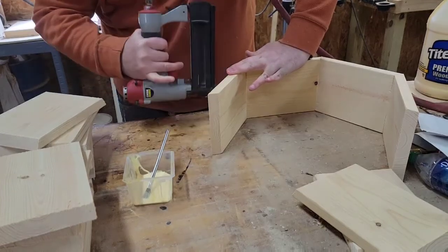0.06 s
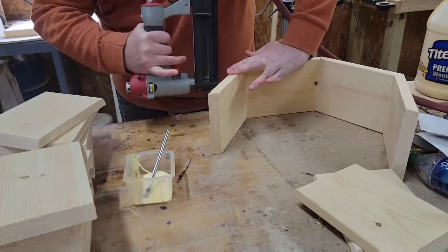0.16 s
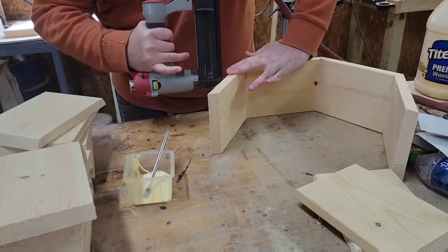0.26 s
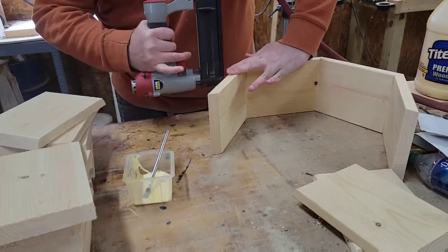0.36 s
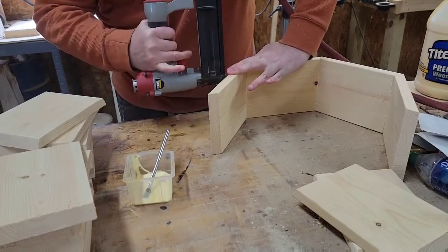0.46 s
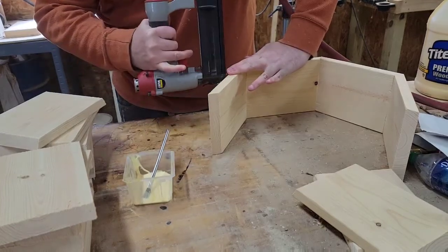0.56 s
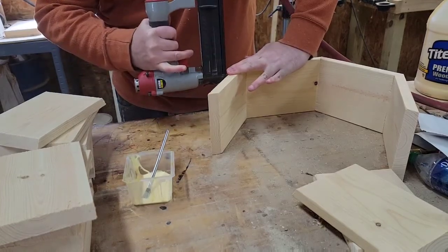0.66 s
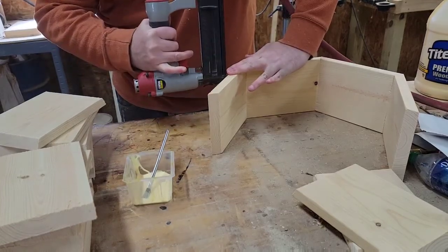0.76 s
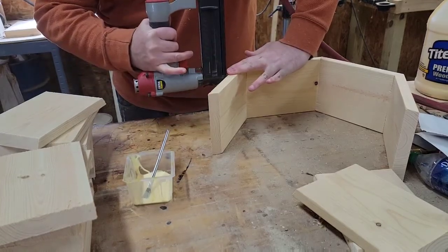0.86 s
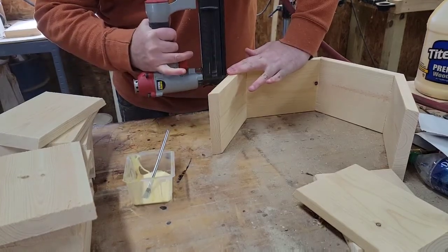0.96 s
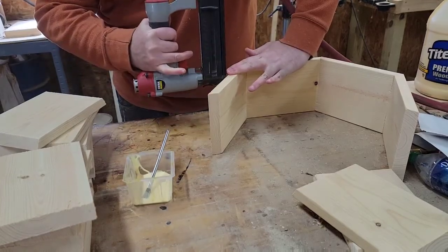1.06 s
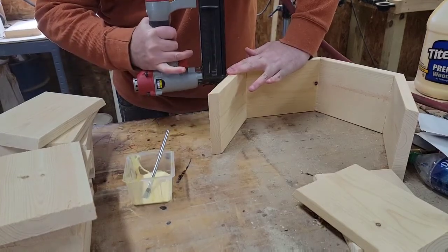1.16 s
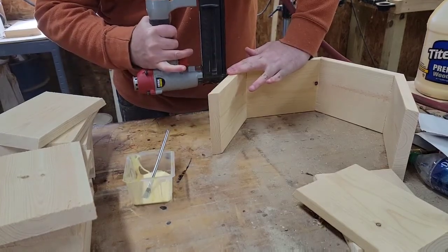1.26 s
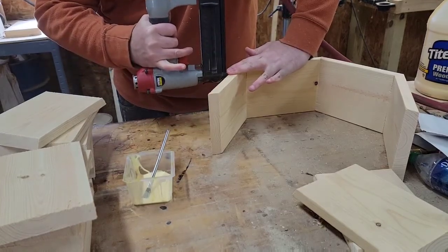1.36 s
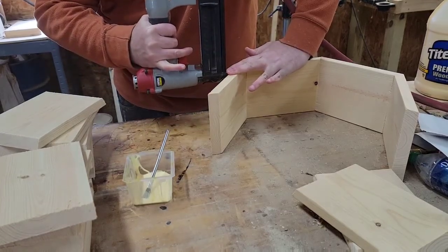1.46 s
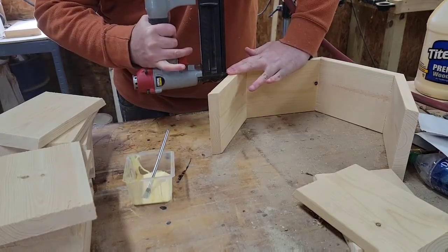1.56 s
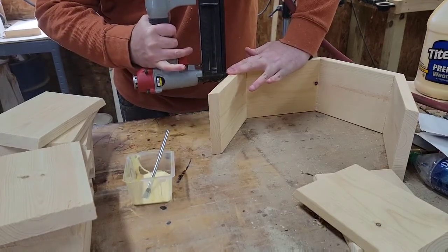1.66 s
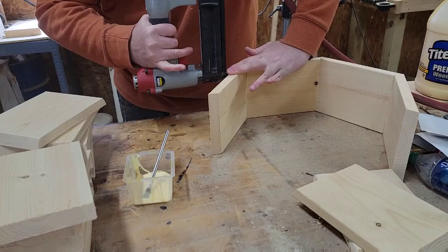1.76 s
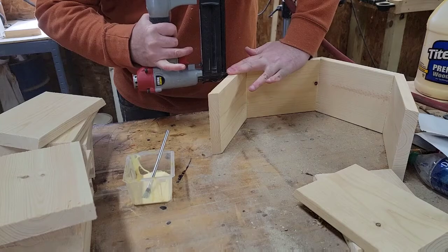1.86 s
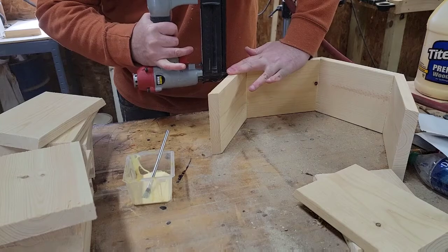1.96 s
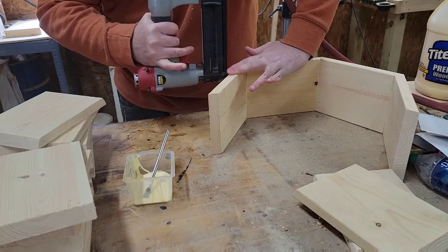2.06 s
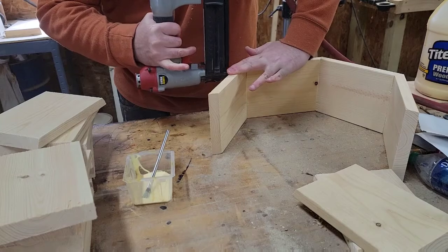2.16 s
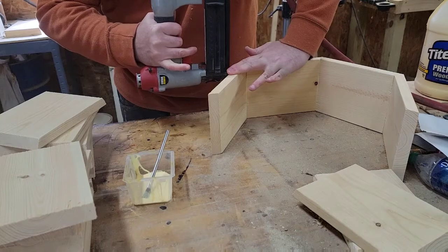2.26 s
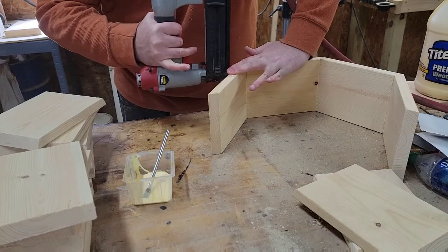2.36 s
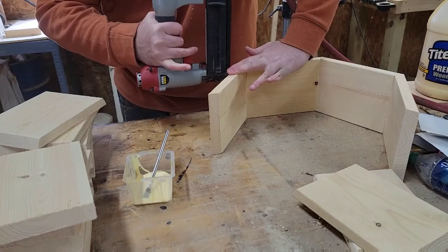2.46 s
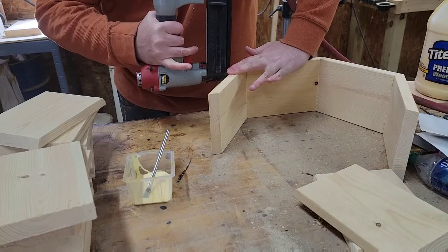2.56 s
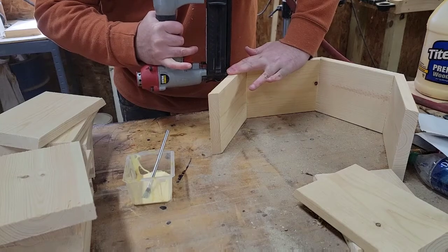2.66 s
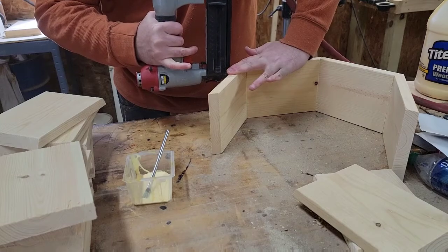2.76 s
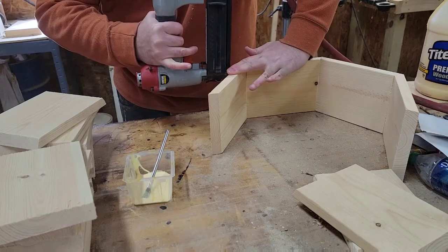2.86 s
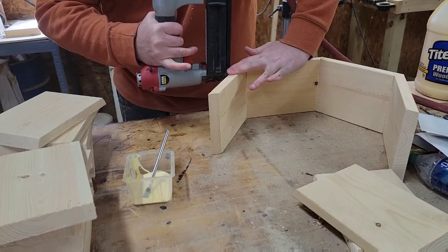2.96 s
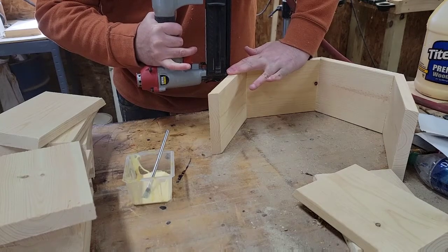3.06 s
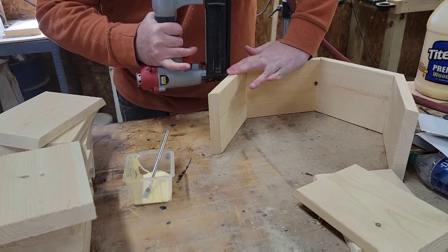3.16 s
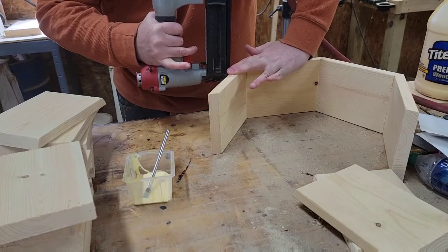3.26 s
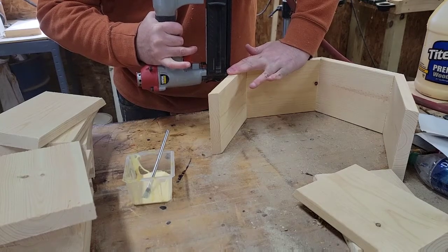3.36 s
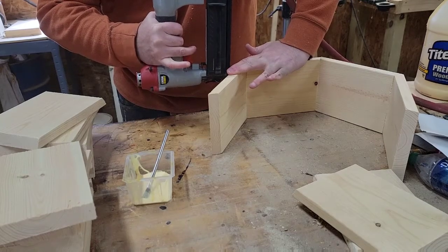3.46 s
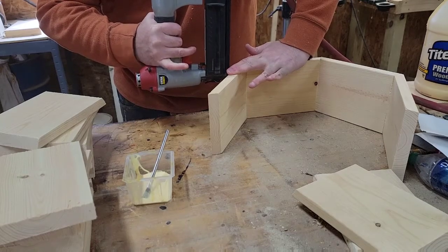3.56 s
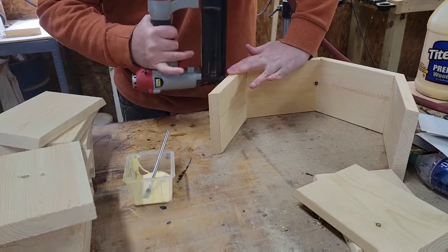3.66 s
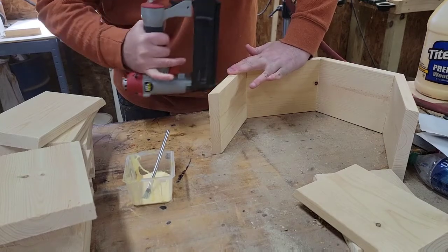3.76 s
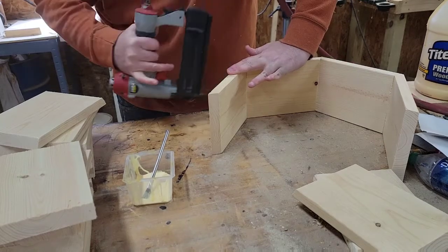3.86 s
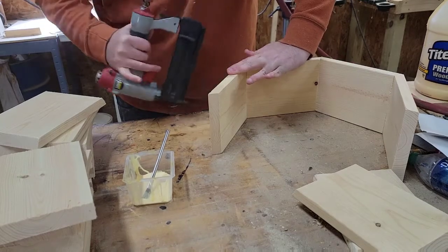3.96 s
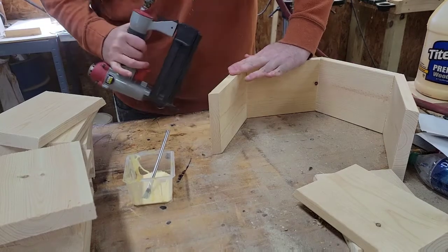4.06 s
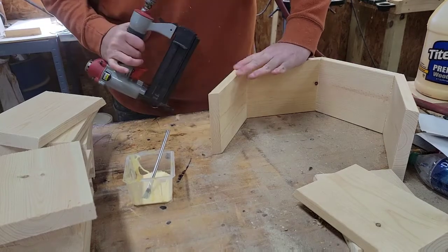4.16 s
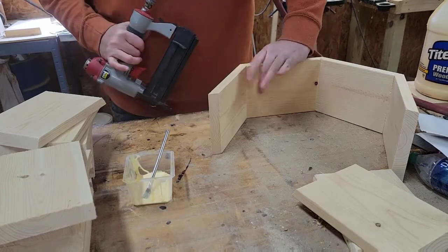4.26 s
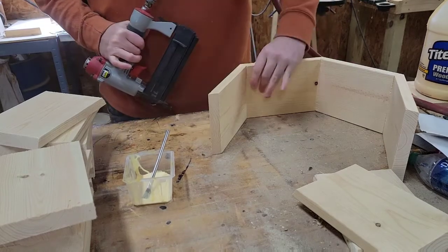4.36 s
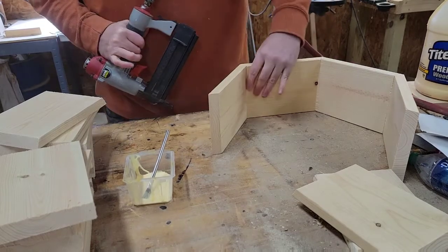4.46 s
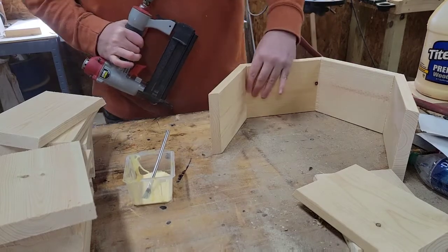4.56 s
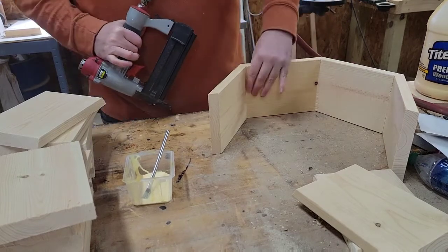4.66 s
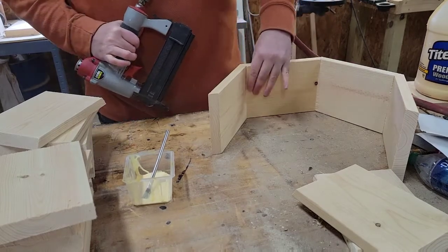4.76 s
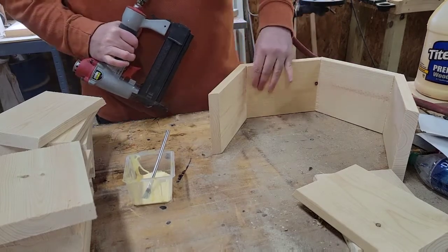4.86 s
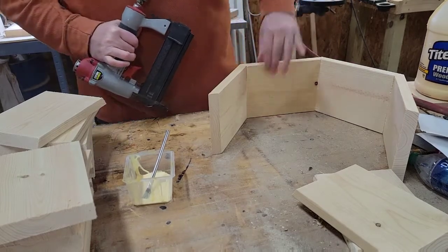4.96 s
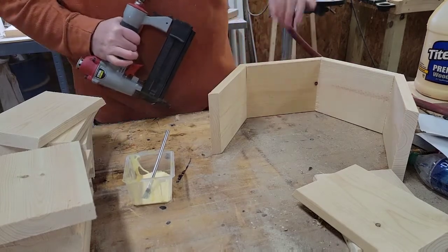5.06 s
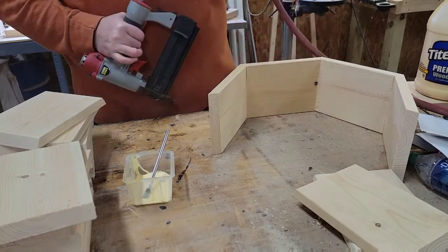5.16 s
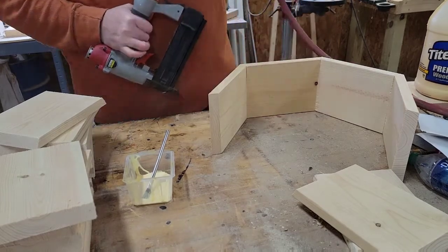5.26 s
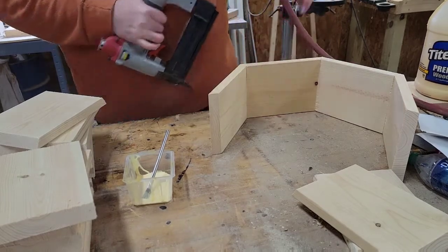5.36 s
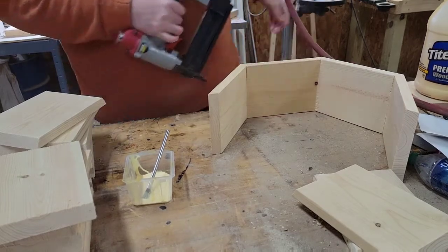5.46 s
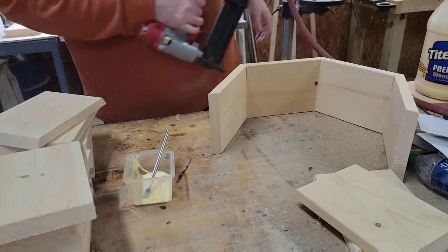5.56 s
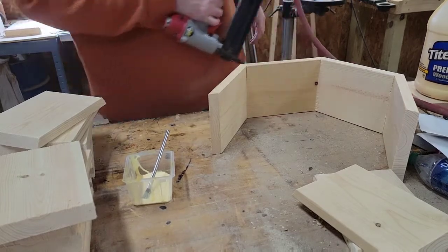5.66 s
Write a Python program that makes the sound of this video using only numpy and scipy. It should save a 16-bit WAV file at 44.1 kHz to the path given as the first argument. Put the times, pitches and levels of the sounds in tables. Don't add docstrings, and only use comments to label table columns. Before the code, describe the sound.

One pneumatic nail shot snaps loudly into wood with an air puff and hall echo, amid constant air-leak hiss and faint knocks.

```python
import sys
import numpy as np
from scipy import signal
from scipy.fft import rfft, irfft
from scipy.io import wavfile

SR = 44100
rng = np.random.default_rng(int(sys.argv[2]) if len(sys.argv) > 2 else 0)


def file_out(sig):
    cols = np.atleast_2d(sig).T
    lim = np.clip(cols, -1, 1)
    pcm = np.round(lim * 32767).astype(np.int16)
    wavfile.write(sys.argv[1], SR, pcm)


def makeup_ratio(level_db):
    decades = np.asarray(level_db, float) / 20
    return 10 ** decades


N = 252252
TIME = np.arange(N) / SR
HZ = np.maximum(np.arange(N // 2 + 1) * SR / N, 1)

# (time [s], level [dB], steel minus wood [dB], left minus right [dB])
BLOWS = [
    (3.498, -19, -9, 1.5),
    (3.5248, 9, -13, 2),
    (3.5276, -1.5, 8, 3),
    (3.5304, -3, 2, -0.5),
    (3.704, -9, 5, 4),
    (3.7182, -21, 24.5, -4.5),
    (3.7195, -19, 21, 1),
    (3.7219, -25.5, 21, -2),
]
# (frequency [Hz], level [dB], 60 dB decay time [s])
WOOD_MODES = [(243, -14, 0.054), (480, -11, 0.016), (706, 0.5, 0.012), (786, 5.5, 0.012), (1020, 1, 0.0097),
              (1350, -10.5, 0.002)]
STEEL_MODES = [(1780, -8, 0.0031), (2520, -3, 0.0035), (3470, -3, 0.0012), (5000, -10.5, 0.00306),
               (6960, -14, .002)]
MODE_SPREAD_DB = 2.5
# (time [s], level [dB], low edge [Hz], high edge [Hz])
BANGS = [
    (3.526, 30.5, 260, 1300),
    (3.716, 23.5, 170, 335.6),
    (3.719, 25, 1300, 4000),
]

# (time [s], level [dB], hold [s])
INLET = [
    (3.502, -7, 0.0091),
    (3.516, -10.5, 0.01),
]
EXHAUST = [
    (3.68, -8.5, 0.014),
    (3.7, -6, 0.013),
    (3.7135, -1, .0025),
]
WHISTLE = [
    (3.484, -14.5, 0.022),
]
INLET_RISE, INLET_FALL = 800, 3300
EXHAUST_RISE, EXHAUST_FALL = 1300, 6800
WHISTLE_RISE = 600
INLET_PAN_DB = 2.5
# (frequency [Hz], density [dB per Hz])
INLET_COLOUR = [(180, -41), (300, -11.5), (892, -23.5), (1090, -16.5), (1280, -22), (2100, -12), (4500, -9),
                (8010, -6), (11500, -10), (15500, -5)]
EXHAUST_COLOUR = [(880, -8), (1500, -20), (2370, -5.5), (3480, -15), (3760, -6.5), (5450, -3.5),
                  (10400, -4), (12500, 0), (15500, -2.5)]
WHISTLE_COLOUR = [(9000, -31), (14000, -16), (15150, 2.5), (15600, -0.5)]
# (frequency [Hz], width [Hz], level [dB])
INLET_PEAKS = [(7600, 1200, 2.7), (15200, 540, 4)]
EXHAUST_PEAKS = [(12780, 1400, 3.6), (15500, 900, 4.5)]
# (time [s], level [dB], frequency [Hz])
POPS = [
    (3.4945, -19.5, 14610),
    (3.504, -0.5, 7600),
    (3.505, -2.5, 6880),
    (3.5135, -7.5, 8200),
]
# (time [s], level [dB], length [s], left minus right [dB])
PUFFS = [
    (3.513, -7, 0.013, 11.5),
    (3.695, -4.5, 0.0074, 4.5),
    (3.708, 3.5, 0.0095, -3),
    (3.728, -14, 0.0019, 1.5),
]

# (time [s], peak [dB], pitch [Hz], tick [dB], left minus right [dB])
TAPS = [
    (0.759, -44.5, 384, 3.5, 4.5),
    (2.119, -58.5, 370, -12, 3),
    (2.188, -55, 362, -8, 10),
    (2.199, -43.5, 1000, -7, -0.5),
    (2.232, -60.5, 420, -8, 4.5),
    (2.275, -58, 437, -12, 13),
    (2.944, -45, 417, -14, 7),
    (3.009, -41, 407, -12.5, -3),
    (4.478, -43, 885, -9, 11.5),
]
OVERTONE_DB = -4
# (time [s], level [dB])
THUDS = [
    (0.761, -29.5),
    (3.013, -59),
]
TICK = [
    (4.712, -48),
]
# (time [s], level [dB], hold [s])
RUB = [
    (5.045, -60.5, 0.061),
]
SCUFF = [
    (2.19, -63, 0.048),
    (2.285, -65, .008),
]
STROKE_RISE, STROKE_FALL = 720, 650
# (frequency [Hz], density [dB per Hz])
RUB_COLOUR = [(500, -18), (950, -23), (1150, -1), (1400, -14), (3500, -13), (6000, -34)]
SCUFF_COLOUR = [(200, -20), (330, 0), (430, 4), (560, -17), (1200, -20), (3000, -35)]

# (time [s], level [dB])
LEAK_LEVEL = [(0, -45.5), (.3, -46.5), (.9, -45), (3.3, -43.5), (4.1, -44), (4.9, -48), (5.3, -48),
              (5.58, -51), (5.72, -47.5)]
# (frequency [Hz], density [dB per Hz])
LEAK_JET = [(300, -32.5), (2000, -12.5), (4000, -6), (6000, -4.5), (9000, -3), (12000, -2.5), (16000, -4.5)]
# (frequency [Hz], width [Hz], level [dB])
LEAK_PEAKS = [(2900, 250, -3), (3260, 140, 9), (3796, 220, -1.5), (4400, 360, 5), (5324, 780, 13.5),
              (6960, 780, 10.5), (7680, 340, 6.5), (12200, 600, -1.5), (12800, 650, 6.5),
              (14600, 1700, 9.5)]
# (frequency [Hz], left-right likeness [-1 to 1])
LEAK_LIKENESS = [(2500, -0.52), (2900, -0.52), (3300, -0.53), (3650, -0.56), (3850, -0.92), (4050, -0.59),
                 (4400, -0.083), (11000, -0.28), (12100, -0.66), (13000, -.2)]
LEAK_DIRECT = 0.3
PORT_LAG_S = 0.000128
LEAK_PAN_DB, LEAK_PAN_DB_PER_S, LEAK_TREBLE_DB = 3.5, 0.26, -1.32
# (time [s], length of the move [s])
PRESS, LIFT, SWING, LOWER = (1.8, 1.55), (3.95, 0.3), (5.17, 0.14), (5.52, 0.12)
# (frequency [Hz], width [Hz], level [dB])
PRESSED = [(7800, 380, -3.5), (10800, 2200, 1.5), (12150, 400, -2.5), (13000, 600, -1.5), (14900, 900, -1)]
LIFTED = [(5650, 500, 3), (6900, 520, -4.5), (7660, 340, -5), (9100, 2700, 0), (13000, 1200, -4.5),
          (14800, 700, -4)]
SWUNG = [(2820, 550, 6), (3300, 170, -6), (3850, 280, 10), (5820, 330, 3), (7340, 300, 4), (7750, 450, -4),
         (11300, 1600, 4.5), (15000, 800, -2)]
LOWERED = [(2700, 500, 8), (3800, 600, 10.5), (5100, 400, 1.5), (7000, 400, -4), (7500, 400, 6.5),
           (9900, 1200, -6), (12100, 970, 5.5)]

# (frequency [Hz], 60 dB decay time [s])
HALL_T60 = [(60, 0.66), (170, 0.49), (500, 0.93), (1200, 0.95), (2700, 0.94), (4000, 0.73), (5500, 0.69),
            (8000, 0.48), (15000, 0.4)]
# (frequency [Hz], level [dB])
HALL_COLOUR = [(60, 2.5), (130, -4.5), (250, 1), (550, -1), (900, 1.5), (1500, 3), (2500, -1.5), (4000, -1),
               (8000, -6.5), (15000, -10)]
# (frequency [Hz], width [Hz], level [dB])
HALL_PEAKS = [(1680, 330, 4.5), (2760, 300, -6), (3350, 450, 6), (4900, 450, 5)]
# (frequency [Hz], left-right likeness [-1 to 1])
LIKENESS = [(60, 0.97), (130, 0.9), (290, 0.46), (640, -0.33), (1410, -0.26), (3100, -0.14), (6820, -0.006),
            (15000, -0.06)]
HALL_DB, HALL_GAP_S = -25.5, 0.019
SHOT_BEFORE_S, SHOT_BEFORE_DB, SHOT_BEFORE_PAN_DB = 3.982, -5.5, 1.5
SHOT_BEFORE_HZ = (434, 4070)

# (frequency [Hz], density [dB per Hz])
FLOOR = [(100, -33.5), (160, -13), (270, 2), (450, -4.5), (650, -5), (1200, 1), (2000, -11), (2600, -1.5),
         (3300, -14), (3700, -38.5), (6000, -49.5)]
RUMBLE = [(15, -41.5), (25, -15), (40, -9), (70, -9.5), (110, -2.5), (150, -15), (200, -20.5), (300, -21.5),
          (400, -40)]
# (frequency [Hz], width [Hz], level [dB])
FLOOR_PEAKS = [(55, 8, 15), (84, 14, 12)]
FLOOR_DB, RUMBLE_DB, RUMBLE_DB_PER_S = -68, -63, 1.1
BOOST_S, BOOST_DB, BOOST_RISE_S, BOOST_FADE_S = 4.1, 13, 0.65, 0.47

# (time [s], lasting dip [dB], hold [s], quick dip [dB])
DUCKS = [
    (-.5, -7, 0.4, -4),
    (3.524, -7.5, 0.7, -5),
    (3.744, -2, 0.85, -5),
]
DUCK_LEAD_S, DUCK_RECOVER_S, QUICK_LEAD_S, QUICK_RECOVER_S = 0.11, 0.57, 0.022, 0.1
CUTOFF_HZ = 15480


def at_hz(points, hz):
    x, y = np.transpose(points)
    return np.interp(np.log(hz), np.log(x), y)


def peaks_db(peaks):
    return sum(top / (1 + (2 * (HZ - hz) / width) ** 2) for hz, width, top in peaks)


def rms_one(x):
    return x / np.sqrt(np.mean(x ** 2) + 1e-20)


def drift(rate_hz):
    r = np.exp(-2 * np.pi * rate_hz / SR)
    white = rng.standard_normal(N + SR)
    return rms_one(signal.lfilter([1], [1, -2 * r, r * r], white)[SR:])


def noise(colour, peaks=(), alike=0):
    db = at_hz(colour, HZ) + peaks_db(peaks)
    mid, side = rfft(rng.standard_normal((2, N))) * makeup_ratio(db)
    alike = np.clip(alike, -1, 1)
    return rms_one(irfft(np.sqrt(1 + alike) * mid + np.sqrt(1 - alike) * side * [[1], [-1]], N))


def bandpass(x, low_hz, high_hz, order):
    return signal.sosfilt(signal.butter(order, [low_hz, high_hz], "band", fs=SR, output="sos"), x)


def ring(hz, t60, length):
    t = TIME[:length]
    return np.sin(2 * np.pi * hz * t) * makeup_ratio(-60 * t / t60)


def surge(rows, rise, fall):
    levels = [db - rise * np.maximum(s - TIME, 0) - fall * np.maximum(TIME - s - hold_s, 0)
              for s, db, hold_s in rows]
    return makeup_ratio(np.max(levels, axis=0))


def bump(s, lead_s, hold_s, settle_s):
    return np.clip(1 + (TIME - s) / lead_s, 0, 1) * np.exp(-np.maximum(TIME - s - hold_s, 0) / settle_s)


def pan(pan_db):
    return makeup_ratio(pan_db * np.array([[0.5], [-0.5]]))


def from_left(x):
    late = irfft(rfft(x[1]) * np.exp(-2j * np.pi * HZ * PORT_LAG_S), N)
    return np.array([x[0], late])


def add(out, s, sound, pan_db=0):
    i = round(s * SR)
    out[:, i:i + sound.shape[-1]] += sound * pan(pan_db)


def driver():
    out = np.zeros((2, N))
    modes = WOOD_MODES + STEEL_MODES
    chance = rng.normal(0, MODE_SPREAD_DB, (len(BLOWS), len(modes), 2, 1))
    grit = rng.standard_normal((len(BLOWS), 2, 400))
    cracks = signal.lfilter([0.6], [1, -0.55], grit)
    crack_decay = makeup_ratio(-60 * TIME[:400] / 0.012)
    for (s, db, steel_db, pan_db), rolls, crack in zip(BLOWS, chance, cracks):
        body = 0
        for k, (hz, mode_db, t60) in enumerate(modes):
            share_db = steel_db if k >= len(WOOD_MODES) else 0
            sign = (-1) ** k
            body = body + sign * makeup_ratio(mode_db + share_db + rolls[k]) * ring(hz, t60, 4000)
        add(out, s, makeup_ratio(db - 1.5) * body, pan_db)
        add(out, s, makeup_ratio(db + steel_db + 0.5) * crack * crack_decay, pan_db)
    return out


def bangs():
    out = np.zeros((2, N))
    for s, db, low_hz, high_hz in BANGS:
        add(out, s, makeup_ratio(db) * bandpass(TIME[:2000] == 0, low_hz, high_hz, 1))
    return out


def jets():
    flutter = makeup_ratio(1.87 * drift(150))
    inlet = surge(INLET, INLET_RISE, INLET_FALL) * noise(INLET_COLOUR, INLET_PEAKS, alike=0.23)
    exhaust = surge(EXHAUST, EXHAUST_RISE, EXHAUST_FALL) * noise(EXHAUST_COLOUR, EXHAUST_PEAKS, alike=0.37)
    whistle = surge(WHISTLE, WHISTLE_RISE, WHISTLE_RISE) * noise(WHISTLE_COLOUR, alike=0.8)
    return flutter * from_left((inlet + whistle) * pan(INLET_PAN_DB) + exhaust)


def valve():
    out = np.zeros((2, N))
    onset = 1 - np.exp(-TIME[:600] / 0.00036)
    for s, db, hz in POPS:
        add(out, s, makeup_ratio(db) * ring(hz, 0.0034, 600) * onset)
    return from_left(out)


def puffs():
    out = np.zeros((2, N))
    for s, db, length_s, pan_db in PUFFS:
        phase = np.linspace(0, 1, round(length_s * SR))
        swing = np.sin(2 * np.pi * phase) * np.sin(np.pi * phase) ** 0.5
        add(out, s, makeup_ratio(db - 7.5) * swing, pan_db)
    return out


def taps():
    out = np.zeros((2, N))
    grit = rng.standard_normal((len(TAPS) + 1, 600))
    ticks = bandpass(grit * makeup_ratio(-60 * TIME[:600] / 0.039), 500, 3200, 2)
    soft = 1 - np.exp(-TIME[:4000] / 0.001)
    overtone = makeup_ratio(OVERTONE_DB) * ring(1200, 0.014, 4000)
    for (s, db, hz, tick_db, pan_db), tick in zip(TAPS, ticks):
        knock = ring(hz, 12 / hz, 4000) + overtone
        add(out, s + 0.0019, makeup_ratio(db + 6) * soft * knock, pan_db)
        add(out, s + 0.0045, makeup_ratio(db + tick_db + 2.5) * tick, pan_db)
    thud = soft * (ring(230, 0.012, 4000) + 0.5 * ring(85, 0.04, 4000))
    for s, db in THUDS:
        add(out, s, -makeup_ratio(db) * thud)
    for s, db in TICK:
        add(out, s, makeup_ratio(db) * ticks[-1])
    return out + surge(RUB, STROKE_RISE, STROKE_FALL) * noise(RUB_COLOUR)


def scuff():
    lumps = makeup_ratio(4.9 * drift(60))
    return surge(SCUFF, STROKE_RISE, STROKE_FALL) * lumps * noise(SCUFF_COLOUR, alike=0.5)


def leak():
    direct = from_left(noise(LEAK_JET, LEAK_PEAKS, alike=0.91))
    diffuse = noise(LEAK_JET, LEAK_PEAKS, alike=at_hz(LEAK_LIKENESS, HZ))
    hiss = np.sqrt(LEAK_DIRECT) * direct + np.sqrt(1 - LEAK_DIRECT) * diffuse
    held = rfft(hiss)
    moves = (PRESS, PRESSED), (LIFT, LIFTED), (SWING, SWUNG), (LOWER, LOWERED)
    for (s, move_s), peaks in moves:
        moved = np.clip((TIME - s) / move_s, 0, 1)
        hiss = (1 - moved) * hiss + moved * irfft(held * makeup_ratio(peaks_db(peaks)), N)
    treble = irfft(rfft(hiss) * np.clip((HZ - 8000) / 2000, 0, 1), N)
    hiss = hiss + (makeup_ratio(LEAK_TREBLE_DB + 1.2 * drift(2.5)) - 1) * treble
    level = makeup_ratio(np.interp(TIME, *np.transpose(LEAK_LEVEL)))
    flutter = makeup_ratio(0.47 * drift(15) + 0.8 * drift(200))
    return level * flutter * pan(LEAK_PAN_DB + LEAK_PAN_DB_PER_S * TIME) * hiss


def hall(x):
    t, tail = TIME[:2 * SR], 0
    flat = [(20, 0), (20000, 0)]
    white = [noise(flat, HALL_PEAKS, alike=at_hz(LIKENESS, HZ))[:, :len(t)] for _ in range(2)]
    edges = 40 * 2 ** np.arange(0, 9.1, 0.5)
    for k, (low, high) in enumerate(zip(edges, edges[1:])):
        hz = np.sqrt(low * high)
        decay = makeup_ratio(at_hz(HALL_COLOUR, hz) - 60 * t / at_hz(HALL_T60, hz))
        tail = tail + bandpass(white[k % 2], low, high, 2) * decay
    tail = makeup_ratio(HALL_DB) * tail * np.clip(t / HALL_GAP_S, 0, 1) ** 3
    return signal.fftconvolve(x[:1], tail, axes=1)[:, :N]


def earlier_shot(wet):
    shift = round(SHOT_BEFORE_S * SR)
    tail = makeup_ratio(SHOT_BEFORE_DB) * np.pad(wet[:, shift:], ((0, 0), (0, shift)))
    return bandpass(tail, *SHOT_BEFORE_HZ, 1) * pan(SHOT_BEFORE_PAN_DB)


def room_floor():
    boost_db = BOOST_DB * bump(BOOST_S, BOOST_RISE_S, 0, BOOST_FADE_S)
    rumble_db = RUMBLE_DB + RUMBLE_DB_PER_S * TIME + boost_db
    air = makeup_ratio(FLOOR_DB) * noise(FLOOR, alike=at_hz(LIKENESS, HZ))
    return air + makeup_ratio(rumble_db) * noise(RUMBLE, FLOOR_PEAKS, alike=0.87)


def scene():
    blows, air, thumps, knocks = driver(), jets() + valve(), puffs(), taps()
    wet = hall(air + bangs() + makeup_ratio(-17.5) * knocks + makeup_ratio(-8) * thumps)
    near = blows + air + thumps + knocks + scuff()
    return near + leak() + wet + earlier_shot(wet) + room_floor()


def gain_control():
    dip_db = 0
    for s, db, hold_s, quick_db in DUCKS:
        dip_db = dip_db + db * bump(s, DUCK_LEAD_S, hold_s, DUCK_RECOVER_S)
        dip_db = dip_db + quick_db * bump(s, QUICK_LEAD_S, 0, QUICK_RECOVER_S)
    return makeup_ratio(dip_db)


def roll_off(x):
    return signal.sosfilt(signal.butter(12, 15720, fs=SR, output="sos"), x)


def record(dry):
    x = signal.sosfilt(signal.butter(2, 45, "high", fs=SR, output="sos"), dry * gain_control())
    x = 1.3 * np.tanh(x / 1.3)
    x = signal.sosfilt(signal.ellip(12, 0.5, 55, CUTOFF_HZ, fs=SR, output="sos"), x)
    return roll_off(x)


dry = scene()
out = record(dry)
file_out(out)
```